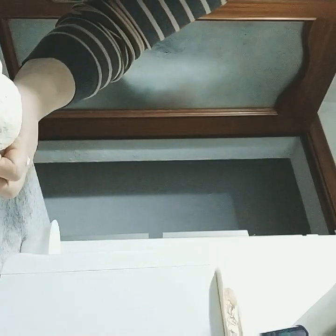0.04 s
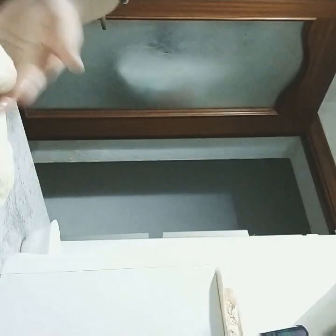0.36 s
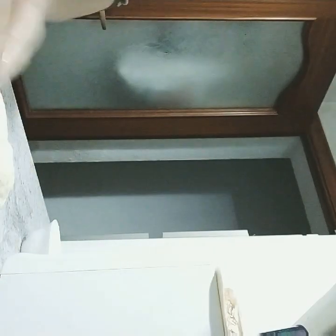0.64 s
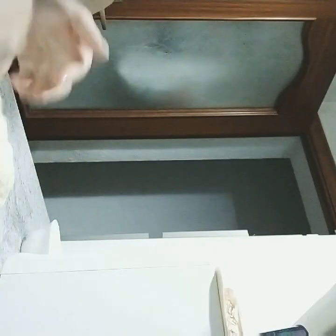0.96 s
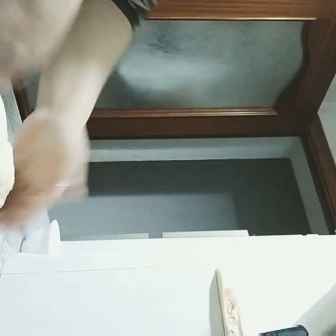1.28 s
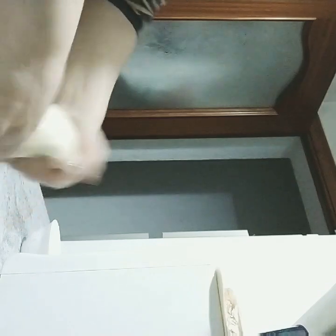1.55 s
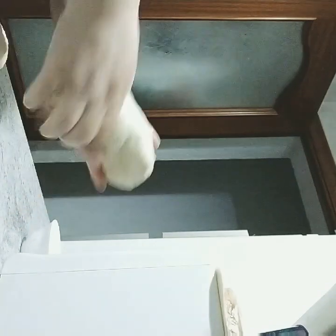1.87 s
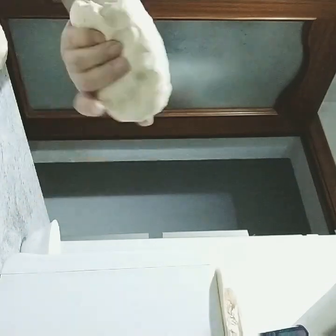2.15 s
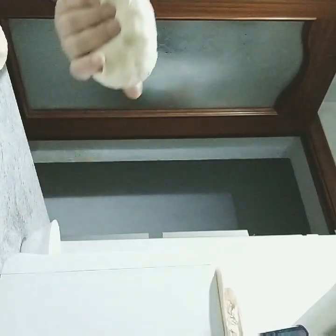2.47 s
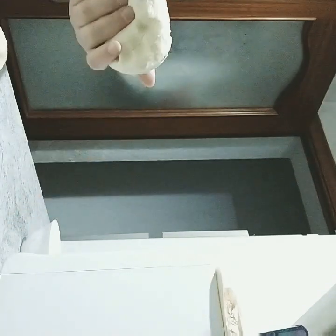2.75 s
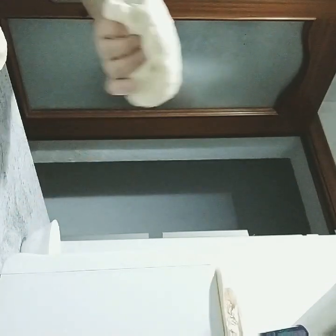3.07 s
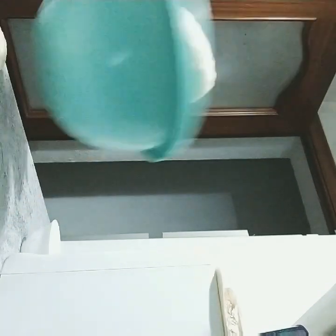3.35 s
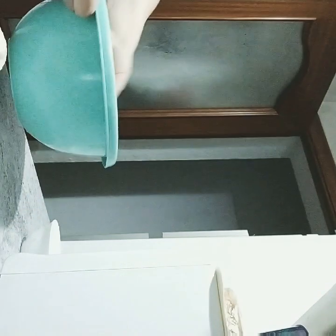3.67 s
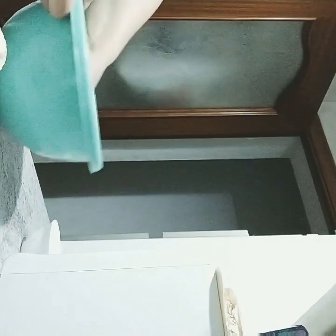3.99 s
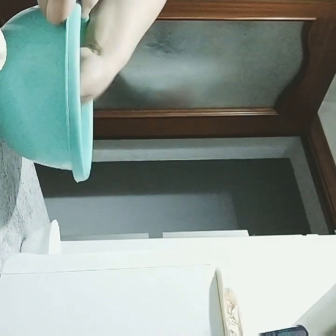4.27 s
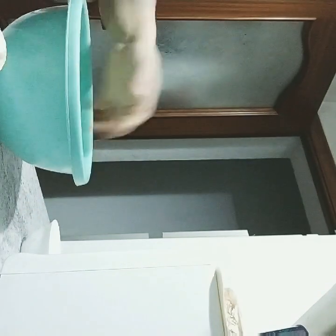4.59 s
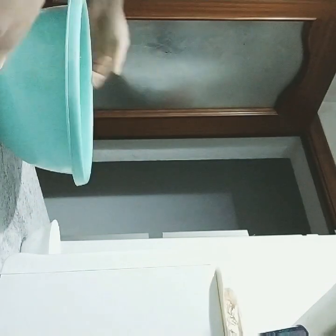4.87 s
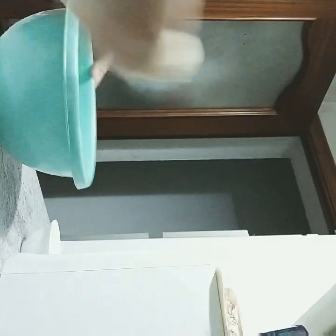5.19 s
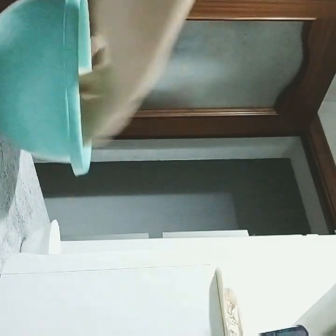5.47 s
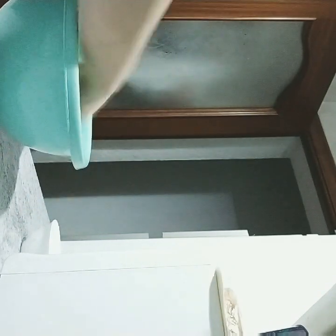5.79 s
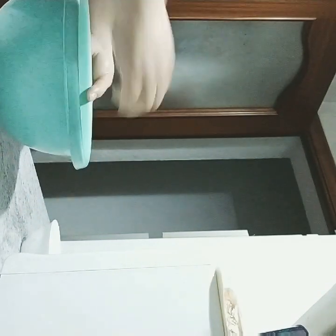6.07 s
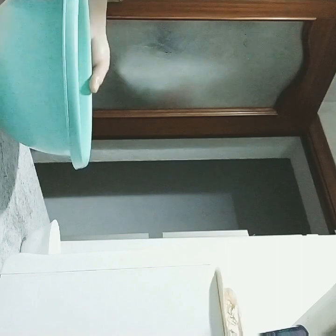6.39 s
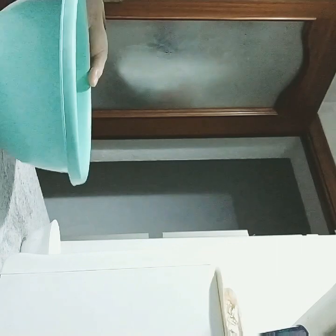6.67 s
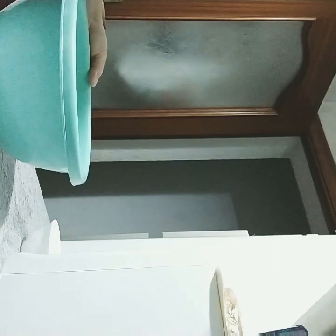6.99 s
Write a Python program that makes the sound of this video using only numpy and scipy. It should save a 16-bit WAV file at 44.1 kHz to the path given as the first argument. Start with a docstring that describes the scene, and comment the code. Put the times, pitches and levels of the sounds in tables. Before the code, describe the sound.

Soft thumps and floury hiss of dough being patted, followed by a loud hollow knock and rasping in a plastic bowl.

```python
"""Over a faint appliance hum, floury hands pat a lump of dough on a kitchen counter.
The counter thuds and rumbles under them, flour hisses, sticky dough ticks and an air pocket bursts.
Then the dough is slapped into a plastic bowl, which knocks and rings, and a hand wipes round its wall.
The work is close by, a little left of a small stereo microphone, in a small room with hard walls."""
import sys
import numpy as np
from scipy import signal
from scipy.fft import rfft, irfft, next_fast_len
from scipy.io import wavfile
from scipy.ndimage import map_coordinates

SR = 44100
rng = np.random.default_rng(int(sys.argv[2]) if len(sys.argv) > 2 else 0)


def materialize(psi):
    """Save the field psi as 16-bit PCM at rate SR to the path in sys.argv[1].

    A 1-D psi becomes a single channel; in a 2-D psi each row is a channel.
    """
    bounded = np.clip(np.atleast_2d(psi).T, -1, 1)
    quanta = np.round(bounded * 32767).astype(np.int16)
    wavfile.write(sys.argv[1], SR, quanta)


N = 310462


def amp(db):
    """Decibels to gain."""
    return 10 ** (np.asarray(db) / 20)


def unit(x):
    """Scale to rms 1."""
    return x / np.sqrt(np.mean(x ** 2) + 1e-20)


def along(points, hz):
    """Read (Hz, value) points on a log frequency axis."""
    point_hz, values = np.transpose(points)
    return np.interp(np.log(hz + 1), np.log(point_hz + 1), values)


def wobble(rate):
    """A smooth random curve with rate knots a second."""
    knots = rng.standard_normal(int(N * rate / SR) + 4)
    return map_coordinates(knots, [np.arange(N) * rate / SR])


def convolve(x, response):
    """Pass each channel through its impulse response."""
    return signal.fftconvolve(x, response, axes=1)[:, :N]


def highpass(x, order, hz):
    """Roll off the bass below hz."""
    return signal.sosfilt(signal.butter(order, hz, "highpass", fs=SR, output="sos"), x)


def colour(x, spectrum, size=4096):
    """Shape a sound with a minimum-phase filter of unit energy."""
    gain = amp(along(spectrum, np.fft.rfftfreq(size, 1 / SR)))
    cepstrum = irfft(np.log(gain))
    cepstrum[1:size // 2] *= 2
    cepstrum[size // 2 + 1:] = 0
    response = irfft(np.exp(rfft(cepstrum)))
    return convolve(x, response[None] / np.linalg.norm(response))


def stereo_noise(count, width):
    """White noise on two channels; width is side over mid."""
    mid, side = rng.standard_normal((2, count))
    return np.array([mid + width * side, mid - width * side])


def add(track, start_s, sound):
    """Mix a sound into a track."""
    start = round(start_s * SR)
    part = sound[..., :N - start]
    track[:, start:start + part.shape[-1]] += part


def burst(t60, width, rise_s):
    """A contact: noise that builds up quickly and dies away."""
    t = np.arange(SR // 3) / SR
    return stereo_noise(len(t), width) * amp(-60 * t / t60) * (1 - np.exp(-t / rise_s))


def ring(modes, scatter_db, spread, tilt=0):
    """Damped modes of alternating sign; spread parts left and right in phase, tilt favours high modes."""
    t = np.arange(SR) / SR
    sides = np.array([[1], [-1]])
    ringing = np.zeros((2, SR))
    for k, (hz, db, t60) in enumerate(modes):
        weight = (-1) ** k * (hz / modes[0][0]) ** tilt
        decay = amp(db + scatter_db * rng.standard_normal() - 60 * t / t60)
        phase = sides * spread * rng.standard_normal()
        ringing += weight * decay * np.sin(2 * np.pi * hz * t + phase)
    return ringing * (1 - np.exp(-t / 0.00019))


def strokes(rows, attack_share, release_s):
    """Gain per sample: each stroke takes hold over a share of its length, swells or eases, and lets go."""
    power = np.zeros(N)
    for start_s, length_s, end_db, swell_db in rows:
        t = np.maximum(np.arange(N) / SR - start_s, 0)
        attack = (1 - np.exp(-t / (attack_share * length_s))) ** 2
        hold = amp(end_db + swell_db * (np.minimum(t / length_s, 1) - 1))
        release = np.exp(-np.maximum(t - length_s, 0) / release_s)
        power += (attack * hold * release) ** 2
    return np.sqrt(power)


def friction(spectrum, grains_per_s, grain_share, flutter_db, width):
    """Powder under a sliding hand: fine hiss and single grains, in uneven slips."""
    caught = rng.random(N) < grains_per_s / SR
    grains = caught * rng.exponential(size=N) * stereo_noise(N, width)
    rub = stereo_noise(N, width) + grain_share * unit(grains)
    slips = amp(flutter_db * wobble(110))
    return unit(colour(rub * slips, spectrum))


# An appliance, centred between the channels. Each row: frequency in Hz, relative level in dB.
HUM_PARTIALS = [(49.5, -65.5), (99, -70), (197, -66)]
# Still air all round the microphone. Each row: frequency in Hz, relative level in dB.
AIR_SPECTRUM = [(20, -22.5), (45, -25.5), (100, -3), (160, -6.5), (200, -21), (260, -11), (500, -13.5),
                (1050, -26), (4500, -26.5), (9000, -26.5), (15500, -33.5)]
# The level of hum and air together. Each row: time in seconds, gain in dB.
ROOM_TONE_LEVEL = [(0, 0), (0.15, -17), (0.25, -39), (0.28, 2), (6.75, -2), (7.04, -16.5)]


def room_tone():
    """An unsteady hum and room air; the level dips briefly near the start and fades at the end."""
    t = np.arange(N) / SR
    hum = sum(amp(db + wobble(2.9)) * np.sin(2 * np.pi * hz * t + 0.58 * wobble(6.9))
              for hz, db in HUM_PARTIALS)
    air = amp(-65.5) * unit(colour(stereo_noise(N, width=0.66), AIR_SPECTRUM))
    times_s, gains_db = np.transpose(ROOM_TONE_LEVEL)
    return amp(np.interp(t, times_s, gains_db, left=-120, right=-120)) * (hum + air)


# The counter ringing. Each row: frequency in Hz, relative level in dB, seconds to fall 60 dB.
COUNTER_MODES = [(53.5, -23, 1), (81.4, 2, 0.18), (102, 2, 0.2), (117, -7, .12), (151.8, -7, 0.19),
                 (184.7, -19, 0.22), (266.5, -23, 0.077)]
# A pat's dull knock and its bright slap. Each row: frequency in Hz, relative level in dB.
PAT_KNOCK_SPECTRUM = [(30, -41), (90, -22), (200, 4), (330, 1.5), (520, -0.5), (700, -8), (900, -11),
                      (1200, -9.5), (2000, -14.5), (5000, -33.5)]
PAT_SLAP_SPECTRUM = [(100, -63), (300, -3), (620, 12), (950, -2), (1800, 9.5), (2700, -0.5), (3800, 0.5),
                     (5200, 1), (6800, 0.5), (9500, 5.5), (15500, -13)]
# Dough and palm landing on the counter, close to the microphone.
# Each row: start in seconds, then relative levels of thud, knock and slap in dB.
DOUGH_PATS = [(0.016, -67, -51, -69.5), (0.272, -38.5, -55, -51), (0.416, -25, -38.5, -34),
              (0.523, -38.5, -48.5, -70), (0.817, -39, -52, -40), (1.114, -22, -32.5, -46),
              (1.468, -36, -43.5, -52.5), (1.527, -44, -47, -58), (1.64, -31, -41.5, -54.5),
              (1.809, -43.5, -57, -53), (5.081, -28, -45.5, -49.5), (5.153, -38.5, -52, -47.5),
              (5.267, -43, -59, -56)]


def pats():
    """Soft dough thumps the counter; the air squeezed from under it slaps."""
    limp_hz, firm_hz = 357, 3660
    thud, knock, slap = np.zeros((3, 2, N))
    for start_s, thud_db, knock_db, slap_db in DOUGH_PATS:
        firmness = amp(slap_db - max(thud_db, knock_db))
        cutoff_hz = min(limp_hz + firm_hz * firmness, SR / 4)  # a firmer pat knocks brighter
        cushion = signal.butter(3, cutoff_hz, fs=SR, output="sos")
        counter = ring(COUNTER_MODES, scatter_db=-1.9, spread=0.076, tilt=-0.35)
        contact = signal.sosfilt(cushion, burst(t60=0.082, width=0.23, rise_s=0.00026))
        add(thud, start_s, amp(thud_db + 3.5) * counter)
        add(knock, start_s, amp(knock_db + 5) * contact)
        add(slap, start_s, amp(slap_db + 1.5) * burst(t60=0.041, width=0.89, rise_s=0.00022))
    return thud + colour(knock, PAT_KNOCK_SPECTRUM) + colour(slap, PAT_SLAP_SPECTRUM)


# Dry flour heard close up. Each row: frequency in Hz, relative level in dB.
FLOUR_SPECTRUM = [(200, -23), (550, -1.5), (900, -5.5), (1900, -3.5), (3400, -3), (5500, -2), (8500, 3.5),
                  (12000, 0), (15500, -8.5)]
# Floury skin brushing the dough.
# Each row: start in seconds, length in seconds, end level in dB, swell over the stroke in dB.
DOUGH_STROKES = [(0.285, 0.031, -60.5, -4.5), (0.327, .058, -46.5, 2.5), (0.59, 0.085, -62, -9.5),
                 (0.84, 0.22, -53.5, 6), (1.12, 0.035, -47.5, 14), (1.21, 0.06, -45.5, 22),
                 (1.37, 0.13, -51, 6.5), (1.56, 0.1, -53, 7), (1.68, 0.063, -46.5, 2),
                 (1.775, 0.1, -51, -1.5), (1.975, .03, -54, 4.5), (2.06, .42, -61.5, -4),
                 (3.11, 0.064, -70.5, -2.5), (3.55, .14, -71, -3), (4.37, 0.068, -62, 1.5),
                 (5.1, 0.089, -52.5, 3.5), (5.205, 0.043, -47.5, 1.5), (5.42, .11, -66.5, -3),
                 (5.57, 0.18, -51, 6), (6.07, 0.054, -65.5, 5)]


def flour_hiss(on_dough, on_bowl):
    """Loose flour hisses under the hand on the dough, and more softly in the bowl."""
    hiss = friction(FLOUR_SPECTRUM, grains_per_s=1300, grain_share=0.79, flutter_db=2.0, width=1.0)
    return np.hypot(on_dough, amp(-9.5) * on_bowl) * hiss


# The counter shaking under a moving hand. Each row: frequency in Hz, relative level in dB.
RUMBLE_SPECTRUM = [(25, -25), (60, -6), (85, 7.5), (105, 1.5), (150, -5.5), (250, -14.5), (400, -17),
                   (1200, -50)]
# Soft nudges against the counter. Each row: start in seconds, level in dB.
COUNTER_NUDGES = [(2.9, -55.5), (4.749, -49), (5.38, -57), (5.59, -53.5), (6.03, -55)]


def counter_rumble(on_dough, on_bowl):
    """Strokes and nudges shake the counter; dough held in the air cannot."""
    lifted_s, lowered_s, nudge_s = 2.05, 4.05, 0.021
    t = np.arange(N) / SR
    on_counter = (t < lifted_s) | (t > lowered_s)
    nudge_rows = [(start_s, nudge_s, db, 0) for start_s, db in COUNTER_NUDGES]
    nudges = strokes(nudge_rows, attack_share=0.15, release_s=0.059)
    pressure = amp(-1.5) * on_dough * on_counter + amp(-4) * on_bowl + nudges
    return pressure * unit(colour(stereo_noise(N, width=0.033), RUMBLE_SPECTRUM))


# Tacky dough parting from the skin. Each row: start in seconds, relative level in dB.
STICKY_TICKS = [(0.605, -46), (0.717, -43.5), (0.7505, -45), (1.063, -38), (1.1109, -37.5), (1.9945, -33),
                (5.4892, -49.5), (5.5361, -47)]


def sticky_ticks():
    """Short bright ticks as the dough lets go of the fingers."""
    ticks = np.zeros((2, N))
    for start_s, db in STICKY_TICKS:
        add(ticks, start_s, amp(db - 3.5) * burst(t60=0.0253, width=1.0, rise_s=0.0011))
    return colour(ticks, FLOUR_SPECTRUM)


# An air pocket bursting under the palm. Each row: frequency in Hz, relative level in dB.
SMACK_SPECTRUM = [(1000, -28), (3800, -10), (4700, 10), (5600, 5.5), (6600, -4), (15000, -22)]


def air_smack():
    """Trapped air escapes through a narrow gap between palm and dough."""
    puff = np.zeros((2, N))
    add(puff, start_s=0.819, sound=amp(-37) * burst(t60=0.031, width=0.66, rise_s=0.00081))
    return colour(puff, SMACK_SPECTRUM)


# The plastic bowl: its body, its bright rim, its wall flexing and its base drumming on the counter. # Each row:
# frequency in Hz, relative level in dB, seconds to fall 60 dB.
BOWL_MODES = [(320, -2, .32), (413, -2, .28), (480, -7, .12), (544, -5, .22), (636, 3, .24), (691, 0, .19),
              (770, -7, .1)]
RIM_MODES = [(984, 0.5, .09), (1084, -4, 0.048), (1265, -7, 0.075), (1935, 1.5, .13), (2270, 1.5, 0.12),
             (2700, -5.5, 0.1), (2880, -5.5, .13)]
FLEX_MODES = [(498, -3, 0.022), (695, -5, 0.017)]
BASE_MODES = [(143, 2, .16), (238, -10, .09), (274, -8, .14)]
# The knock and the slap of a blow on plastic. Each row: frequency in Hz, relative level in dB.
BOWL_KNOCK_SPECTRUM = [(30, -43.5), (80, -12), (150, 5), (215, 1), (270, -1.5), (340, -0.5), (520, -2),
                       (680, -4), (860, -25.5), (1050, -13), (1250, -25.5), (4000, -49)]
BOWL_SLAP_SPECTRUM = [(300, -5.5), (1100, -2.5), (1450, -1), (2200, 3.5), (3000, -1.5), (4100, -6),
                      (6500, -8.5), (10000, -13.5), (15500, -26)]
# Blows on the bowl, on the same counter.
# Each row: start in seconds, then relative levels of thud, knock and slap in dB.
BOWL_BLOWS = [(2.742, -40.5, -52.5, -52.5), (2.798, -46, -60, -49.5), (2.878, -49, -61, -47.5),
              (3.438, -56.5, -62.5, -46.5), (4.081, -5.5, -16, -21.5), (4.091, -21.5, -29.5, -30.5),
              (4.184, -45, -40, -40.5), (4.207, -48, -31, -41.5), (4.475, -24.5, -23.5, -52),
              (5.69, -41, -43, -37.5), (5.719, -24, -37.5, -63.5), (5.8, -34.5, -40, -38)]


def bowl_blows():
    """The plastic wall bends, cracks and rings, and passes the blow on to the counter."""
    hard_contact_s, hard_db, doubling_db = 0.00019, -20.5, 6.5
    thud, knock, slap, wall = np.zeros((4, 2, N))
    for start_s, thud_db, knock_db, slap_db in BOWL_BLOWS:
        softness = (hard_db - max(knock_db, slap_db)) / doubling_db
        contact_s = hard_contact_s * 2 ** softness  # softer blows build up more slowly
        add(thud, start_s, amp(thud_db - 10) * ring(COUNTER_MODES, scatter_db=3.2, spread=0.08, tilt=0.8))
        add(thud, start_s, amp(thud_db - 12) * ring(BASE_MODES, scatter_db=-2.0, spread=0.15))
        add(knock, start_s, amp(knock_db) * burst(t60=0.083, width=1.0, rise_s=contact_s))
        add(wall, start_s, amp(knock_db + 8.5) * ring(FLEX_MODES, scatter_db=-1.5, spread=0.066))
        add(wall, start_s, amp(knock_db - 13.5) * ring(BOWL_MODES, scatter_db=2.5, spread=1.0))
        first_touch = amp(slap_db + 7.5) * burst(t60=0.0084, width=0.96, rise_s=contact_s)
        dough_spreading = amp(slap_db - 2.5) * burst(t60=0.1, width=0.32, rise_s=contact_s + 0.003)
        add(slap, start_s, first_touch + dough_spreading)
        add(wall, start_s, amp(slap_db - 15.5) * ring(RIM_MODES, scatter_db=0.5, spread=0.53))
    return thud + wall + colour(knock, BOWL_KNOCK_SPECTRUM) + colour(slap, BOWL_SLAP_SPECTRUM)


# Flour rasping on plastic. Each row: frequency in Hz, relative level in dB.
RASP_SPECTRUM = [(30, -37.5), (100, -5.5), (250, 1), (380, 4), (620, 5), (850, -9.5), (1050, -3.5),
                 (1400, -7.5), (1950, 3.5), (3200, -3.5), (4600, -8), (9000, -8.5), (15000, -25)]
# The hand wiping and dragging the bowl.
# Each row: start in seconds, length in seconds, end level in dB, swell over the stroke in dB.
BOWL_STROKES = [(3.44, 0.054, -66, 6), (3.82, 0.17, -67.5, -1), (4.205, 0.023, -49, 1),
                (4.695, 0.093, -49, 4.5), (4.85, 0.24, -67.5, 1), (5.15, .11, -61, -5.5),
                (5.53, .16, -54, 4.5), (5.7, 0.12, -47.5, -1), (5.85, 0.052, -49, -0.5),
                (6.34, 0.23, -72, -10), (6.61, .18, -55, 1.5)]


def bowl_wipe(on_bowl):
    """A floury hand rasps on the bowl wall and sets it ringing."""
    rasp = on_bowl * friction(RASP_SPECTRUM, grains_per_s=360, grain_share=0.62, flutter_db=1.5, width=0.89)
    modes = ring(BOWL_MODES + RIM_MODES, scatter_db=5.5, spread=0.82)
    hollow = convolve(rasp, modes / np.linalg.norm(modes))
    return rasp + amp(-23) * hollow


# The hands work left of the microphone; the blows on the bowl sit nearer the middle.
# Each row: frequency in Hz, left minus right in dB.
HANDS_BALANCE = [(100, 1), (180, -1), (330, 5.5), (620, 4), (1200, 5.5), (2400, 2.5), (4500, 4), (8000, 7),
                 (15000, 10)]
BOWL_BALANCE = [(100, 0), (170, -2.5), (300, 7), (450, 1.5), (680, 0.5), (1200, 8.5), (2100, 0.5),
                (3400, 3), (8000, 4.5), (15000, 4.5)]


def place(x, balance):
    """Share each frequency between the left and right of the microphone."""
    size = next_fast_len(N + SR // 2)
    lean_db = along(balance, np.fft.rfftfreq(size, 1 / SR))
    return irfft(rfft(x, size) * amp([lean_db / 2, -lean_db / 2]), size)[:, :N]


# Counter, door and cupboard, near the microphone.
# Each row: left delay in seconds, right delay in seconds, level in dB.
EARLY_ECHOES = [(.0009, 0.0011, -27.5), (.0029, 0.0025, -14), (.0052, .0064, -16.5), (.0118, .0101, -15)]


def early_echoes(x):
    """Close surfaces send back the treble, a little later at one side than at the other."""
    taps = np.zeros((2, SR // 20))
    for left_s, right_s, db in EARLY_ECHOES:
        taps[0, round(left_s * SR)] = taps[1, round(right_s * SR)] = amp(db)
    return convolve(x, highpass(taps, order=1, hz=500))


# The small kitchen dying away. Each row: frequency in Hz, seconds to fall 60 dB.
KITCHEN_DECAY = [(120, 0.52), (500, 0.28), (1500, 0.36), (5000, 0.29), (14000, 0.084)]


def kitchen_reverb(x):
    """Hard walls answer 6 ms later with a diffuse tail, different at each side."""
    hz, t, noise = signal.stft(rng.standard_normal((2, SR)), SR, nperseg=256)
    decay = amp(-60 * t / along(KITCHEN_DECAY, hz)[:, None])
    _, tail = signal.istft(noise * decay, SR, nperseg=256)
    tail = highpass(tail / np.linalg.norm(tail[0]), order=2, hz=135)
    delayed = np.pad(x, ((0, 0), (round(0.006 * SR), 0)))
    return convolve(delayed, tail)


def scene():
    """Hands and bowl as they reach the microphone, with the kitchen's echoes and room tone."""
    on_dough = strokes(DOUGH_STROKES, attack_share=0.095, release_s=0.024)
    on_bowl = strokes(BOWL_STROKES, attack_share=0.15, release_s=0.028)
    contacts = pats() + sticky_ticks() + air_smack()
    rubbing = flour_hiss(on_dough, on_bowl) + bowl_wipe(on_bowl) + counter_rumble(on_dough, on_bowl)
    work = place(contacts + rubbing, HANDS_BALANCE) + place(bowl_blows(), BOWL_BALANCE)
    return work + early_echoes(work) + amp(-10) * kitchen_reverb(work) + room_tone()


def record(dry):
    """The deep bass is rolled off, and the highest treble is cut off."""
    top_hz = 15850
    size = next_fast_len(N + SR // 2)
    thin = highpass(dry, order=3, hz=38)
    in_band = np.fft.rfftfreq(size, 1 / SR) < top_hz
    return irfft(rfft(thin, size) * in_band, size)[:, :N]


dry = scene()
out = record(dry)
materialize(out)
```